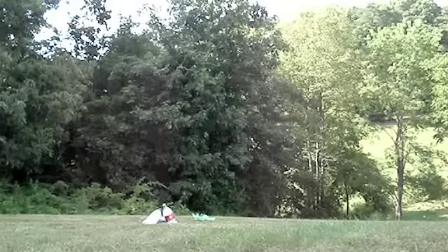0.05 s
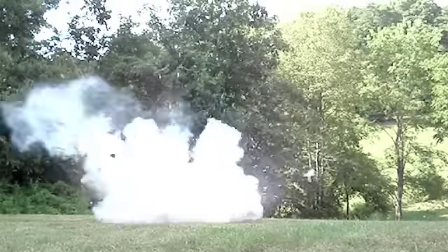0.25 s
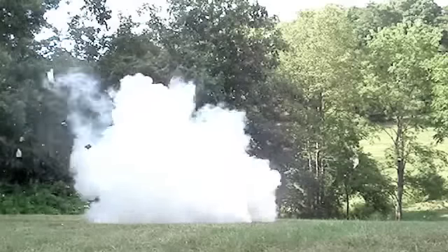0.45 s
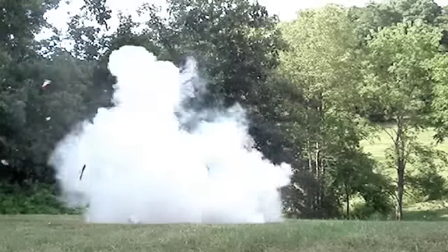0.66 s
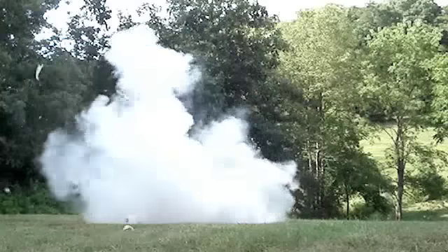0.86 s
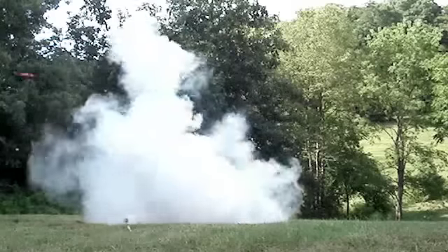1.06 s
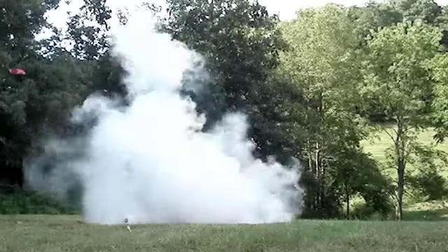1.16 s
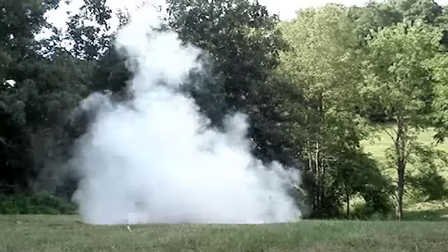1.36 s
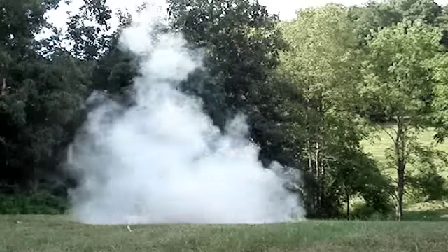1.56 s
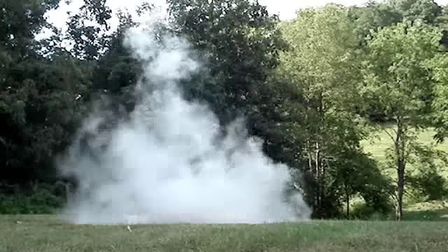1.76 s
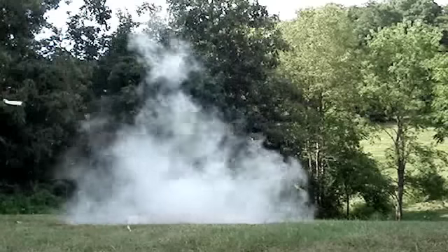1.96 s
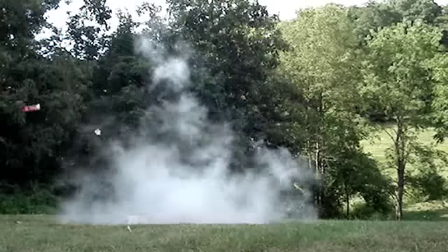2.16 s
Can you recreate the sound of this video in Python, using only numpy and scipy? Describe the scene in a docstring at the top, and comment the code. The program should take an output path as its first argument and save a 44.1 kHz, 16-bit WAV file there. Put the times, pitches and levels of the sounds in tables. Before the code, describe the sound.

One explosion on a lawn by trees: brief faint hiss, then a hard clipped crack with a short low thump, a bright dense roar, scattered echo slaps and dulling rumble, faint debris ticks, on a small distant microphone.

```python
"""A lawn near a tree line, where a sealed gas charge bursts, heard from a distance by a small microphone.
Steep shock fronts and damped low thumps overload it. The near trees throw back a bright roar and far woods
and slopes a grainy rumble that dulls with distance, both built from clumped, coloured noise. Short ringing
bursts make slaps off large surfaces, and clicks of noise make debris ticks. Beneath lie faint shaped-noise
hiss and wind, with fuzzy sine tones for a hum and two insects."""
import sys
import numpy as np
from scipy import signal
from scipy.fft import rfft, irfft
from scipy.io import wavfile
from scipy.ndimage import uniform_filter1d

SR = 44100
rng = np.random.default_rng(int(sys.argv[2]) if len(sys.argv) > 2 else 0)


def generate_wav(signal):
    """Clip the signal to [-1, 1] and save it as 16-bit WAV at the path in sys.argv[1]."""
    frames = np.transpose(np.atleast_2d(signal))
    scaled = np.clip(frames, -1, 1) * 32767
    pcm = np.round(scaled).astype(np.int16)
    wavfile.write(sys.argv[1], SR, pcm)


N = 97020
T = np.arange(N) / SR  # s

# Shock fronts, level before the short onset rounds them: t/s, level/dB, length/ms
SHOCK_FRONTS = [(.2474, 3, 0.18), (0.2494, 6, 0.17), (0.2533, 3, 0.48), (0.2587, -4, 0.75),
                (0.2621, 1, 0.34), (0.2661, 8, 0.16), (0.2752, 14, 0.21), (.2798, 15, 0.068)]
# Low thumps of the expanding gas and their slaps: t/s, f/Hz, starting level/dB, 60 dB decay time/s
GAS_THUMPS = [(0.248, 318, -4.5, 0.049), (0.2529, 138, 3.5, 0.033), (0.264, 313, -12, 0.041),
              (0.2823, 300, -6.5, 0.009), (.3630, 330, -26, 0.025), (0.2646, 157, -18, 0.076),
              (.3240, 147, -10.5, 0.048), (0.354, 175, -26, .08)]
FRONT_S = .00004  # time constant of the shock onset


def blast():
    """Steep fronts swing one way and then back; the gas adds sine swings that die exponentially."""
    out, t = np.zeros(N), T[:6000]
    for start, db, length_ms in SHOCK_FRONTS:
        u = t * 1000 / length_ms
        onset = 1 - np.exp(-t / FRONT_S)
        swing = (1 - (u / 2) ** 2) * np.exp(-u * u / 2)  # crosses zero after two lengths
        add(out, start, -gain_of(db) * onset * swing)
    for start, hz, db, t60 in GAS_THUMPS:
        add(out, start, gain_of(db - 60 * t / t60) * np.sin(2 * np.pi * hz * t))
    return out


# Roar envelopes of the near trees: t/s, middle level/dB, treble level/dB, bass level/dB
NEAR_LEVELS = [(.247, -10, -19, -28), (0.249, -17, -20, -28), (0.2555, -12, -7, -30),
               (0.256, -32, -16, -28), (0.259, -9, -14, -30), (.262, -10.5, -17, -25),
               (0.268, -17, -18, -25), (0.276, -16, -15, -22.5), (0.29, -23.5, -11, -20.5),
               (0.303, -21, -12.5, -33), (.33, -13, -12.5, -19), (0.375, -12.5, -14, -21.5),
               (0.409, -16.5, -17, -29), (.5, -22.5, -26, -31), (.58, -30.5, -33, -42.5),
               (0.699, -37, -54, -68)]
# Spectra of the roar's middle, treble and bass: f/Hz, relative level/dB (per Hz)
NEAR_MIDDLE_COLOUR = [(290, -23), (550, -13.5), (800, -3.5), (1400, -4), (2200, -5.5), (3200, -12.5),
                      (6000, -37), (22000, -100)]
NEAR_TREBLE_COLOUR = [(1000, -30), (2000, -9), (3300, -4), (4800, -6.5), (6300, -10), (9200, -18),
                      (10200, -25), (22000, -76)]
NEAR_BASS_COLOUR = [(20, -30), (50, -21), (120, -3.5), (320, 1.5), (600, -6), (1200, -42), (22000, -84)]
NEAR_PATCHY_DB = .9


def near_trees():
    """Dense bright scatter in three bands, starting with the first shock front."""
    times, *band_levels = np.transpose(NEAR_LEVELS)
    colours = NEAR_MIDDLE_COLOUR, NEAR_TREBLE_COLOUR, NEAR_BASS_COLOUR
    roar = np.zeros(N)
    for db, colour, grain_s in zip(band_levels, colours, (.002, .001, .005)):
        band = scatter(colour, grain_s, spread_db=0.5, patchy_db=NEAR_PATCHY_DB)
        roar += gain_of(np.interp(T, times, db, right=-120)) * band
    return (T > SHOCK_FRONTS[0][0]) * roar


# Distinct slaps from single large surfaces: t/s, level/dB, centre f/Hz, decay/s (swell peaks at half of it)
SURFACE_SLAPS = [(0.248, 3.5, 2680, 0.0028), (0.2752, -1, 1852, 0.0091), (0.28, 1.5, 2410, 0.0023),
                 (.6102, -13, 2880, 0.0019), (.6135, -26, 1540, 0.0042), (.6200, -11, 874, 0.0038),
                 (.6560, -19, 2630, 0.01), (.6625, -18, 1220, 0.003), (.7185, -14, 1700, 0.0041),
                 (.7640, -22, 684, 0.006), (.7844, -30, 1420, 0.0036), (1.108, -28, 980, .006),
                 (1.150, -16, 1370, 0.0037), (1.313, -27, 586, 0.0049), (1.347, -29, 460, 0.0015),
                 (1.630, -23.5, 920, 0.003), (1.690, -39, 350, 0.0042), (1.768, -33, 1240, 0.011),
                 (2.145, -26, 285, 0.0042)]
SLAP_WIDTH, SLAP_RING, SLAP_NOISE = .8, .35, .25  # band spread as a fraction, then mix of sine and noise


def surface_slaps():
    """Each reflection swells and dies briefly, a sine ring mixed with noise around its centre pitch."""
    out, t = np.zeros(N), T[:2000]
    for start, db, hz, decay in SURFACE_SLAPS:
        edges = [hz / (1 + SLAP_WIDTH), hz * (1 + SLAP_WIDTH)]
        band = signal.butter(2, edges, "band", fs=SR)
        noise = evened(signal.lfilter(*band, rng.standard_normal(len(t))))
        burst = SLAP_RING * np.sin(2 * np.pi * hz * t) + SLAP_NOISE * noise
        u = 2 * t / decay
        swell = np.e * u * np.exp(-u)  # peaks at 1
        add(out, start, gain_of(db) * burst * swell)
    return out


# Rumble envelopes of far woods and slopes: t/s, roar level/dB, bass level/dB, deep bass level/dB
FAR_LEVELS = [(.55, -44, -37, -55), (.62, -30.5, -37, -37.5), (.70, -32.5, -38, -43.5),
              (.76, -29, -37, -45), (.82, -29, -34, -46), (.88, -27.5, -33, -34), (0.951, -28, -34, -42),
              (1.02, -30.5, -33, -50), (1.12, -31.5, -36.5, -45), (1.2, -35, -40.5, -47),
              (1.3, -36.5, -38.5, -48.5), (1.4, -39.5, -40, -56), (1.52, -42, -42, -51),
              (1.6, -43.5, -41, -55), (1.68, -46.5, -41, -49), (1.76, -38.5, -44, -52),
              (1.83, -44, -45, -55), (1.92, -47.5, -50, -59), (2.0, -55, -46, -56), (2.07, -60, -47.5, -63),
              (2.12, -54, -46, -65), (2.2, -47, -41, -60)]
# Spectra of the rumble's roar (as it is at FAR_S), bass and deep bass: f/Hz, relative level/dB (per Hz)
FAR_ROAR_COLOUR = [(300, -28), (550, -10), (950, -2), (1400, -3.5), (2100, -8), (3300, -13.5), (4800, -18),
                   (6500, -24.5), (8000, -34.5), (10000, -49.5), (22000, -100)]
FAR_BASS_COLOUR = [(110, -57), (190, -22.5), (243, -2), (386, -1.5), (447, -4), (700, -13.5), (910, -14),
                   (1540, -120)]
FAR_DEEP_COLOUR = [(20, -28), (45, -29), (90, -8), (150, 1), (200, -1.5), (300, -36), (22000, -120)]
FAR_S, FAR_RISE_S = .85, 0.16  # reference time of the air loss, fade-in before the first level
AIR_DB_PER_S, AIR_POWER = 4, 1.334  # scale and frequency power of the air loss, relative to 1 kHz
FAR_PATCHY_DB = 1.1


def far_woods():
    """Lumpier scatter in three bands; air steadily dulls the roar as its echo paths lengthen."""
    times, roar_db, bass_db, deep_db = np.transpose(FAR_LEVELS)
    roar = scatter(FAR_ROAR_COLOUR, 0.0036, spread_db=1.0, air_db=AIR_DB_PER_S, patchy_db=FAR_PATCHY_DB)
    bass = scatter(FAR_BASS_COLOUR, .004, spread_db=2.0, patchy_db=FAR_PATCHY_DB)
    # negative spreads turn the peaks into dips
    deep = scatter(FAR_DEEP_COLOUR, 0.013, spread_db=-2.1, patchy_db=-2.85)
    rumble = gain_of(np.interp(T, times, roar_db)) * roar
    rumble += gain_of(np.interp(T, times, bass_db)) * bass
    rumble += gain_of(np.interp(T, times, deep_db)) * deep
    return np.clip(1 + (T - times[0]) / FAR_RISE_S, 0, 1) * rumble


# Debris ticking on the ground: t/s, level/dB (before the burst's own noise level)
DEBRIS_TICKS = [(1.3524, -40), (1.4160, -27.5), (1.4254, -32), (1.434, -45), (1.5734, -50), (1.6824, -41),
                (2.0326, -35), (2.104, -33)]
TICK_S, TICK_LOW_HZ, TICK_HIGH_HZ = 0.0015, 1700, 7000  # decay time constant, noise band
TICK_BODY_HZ, TICK_BODY = 2220, 0.41  # pitch and share of the sine body


def debris_ticks():
    """Each impact is a quickly dying burst of treble noise with a short sine body."""
    out, t = np.zeros(N), T[:2000]
    band = signal.butter(2, [TICK_LOW_HZ, TICK_HIGH_HZ], "band", fs=SR)
    for start, db in DEBRIS_TICKS:
        noise = signal.lfilter(*band, rng.standard_normal(len(t)))
        body = TICK_BODY * np.sin(2 * np.pi * TICK_BODY_HZ * t)
        add(out, start, gain_of(db) * (noise + body) * np.exp(-t / TICK_S))
    return out


# Spectrum of the faint hiss: f/Hz, relative level/dB (per Hz)
HISS_COLOUR = [(20, -23), (40, -8), (120, -8.5), (200, 1), (450, -2.5), (1400, -6.5), (3500, -11.5),
               (7300, -18.5), (8500, -18.5), (10000, -23), (22000, -62)]
HISS_DB = -46.5


def hiss():
    """Fine-grained shaped noise at a steady level."""
    return gain_of(HISS_DB) * scatter(HISS_COLOUR, 0.00057, spread_db=1, patchy_db=-0.54)


# Low wind on the microphone: t/s, level/dB
WIND_LEVELS = [(0, -56), (.2, -62.5), (.5, -76), (1.8, -72), (2.2, -65)]
# Spectrum of the wind: f/Hz, relative level/dB (per Hz)
WIND_SPECTRUM = [(15, -13), (40, -2), (110, -2), (250, -20), (22000, -120)]


def wind():
    """Low noise on the microphone with a slow level curve and coarse grain."""
    return gain_of(np.interp(T, *np.transpose(WIND_LEVELS))) * scatter(WIND_SPECTRUM, .02, spread_db=-3.0)


# Steady thin tones, a hum and two insects: f/Hz, rms level/dB, fuzz bandwidth/Hz, fuzz amount/0-1
THIN_TONES = [(236, -52.5, 3, 0.17), (7950, -74.5, 30, .6), (8680, -67, 90, .8)]


def hum_and_insects():
    """Sines whose strength and phase are roughened by slow complex noise."""
    out = np.zeros(N)
    for hz, db, width, fuzz in THIN_TONES:
        noise = rng.standard_normal(N) + 1j * rng.standard_normal(N)
        slow = signal.lfilter([1], [1, -np.exp(-np.pi * width / SR)], noise)
        carrier = np.exp(2j * np.pi * hz * T)
        tone = ((1 + fuzz * slow / np.std(slow)) * carrier).real
        out += gain_of(db) * evened(tone)
    return out


def scatter(colour, grain_s, spread_db, air_db=0., patchy_db=0.):
    """Dense small echoes as noise in uneven clumps, patchy in time and pitch, dulled by air and coloured."""
    size = max(round(grain_s * SR), 1)
    clumps = rng.exponential(1, N) - 1
    clumps = evened(uniform_filter1d(uniform_filter1d(clumps, size), size))
    grains = evened(rng.standard_normal(N) * gain_of(spread_db * clumps))
    hz, t, z = signal.stft(grains, SR, nperseg=512, noverlap=384)
    patches = uniform_filter1d(rng.standard_normal(z.shape), 8, 0)
    patches = evened(uniform_filter1d(patches, 6, 1))
    # zero at 1 kHz, growing with frequency and time
    loss_db = air_db * ((hz[:, None] / 1000) ** AIR_POWER - 1) * np.maximum(t - FAR_S, -.2)
    z = z * gain_of(patchy_db * patches - loss_db)
    patchy = signal.istft(z, SR, nperseg=512, noverlap=384)[1][:N]
    tint = evened(gain_of(read(colour, np.fft.rfftfreq(N, 1 / SR))))
    return irfft(rfft(patchy) * tint, N)


def gain_of(db):
    """Amplitude factor of a level in dB."""
    return 10 ** (np.asarray(db) / 20)


def evened(x):
    """Scale to an rms of 1."""
    return x / np.sqrt(np.mean(x ** 2) + 1e-20)


def read(points, hz):
    """Read a spectrum curve along a logarithmic frequency axis."""
    f, value = np.transpose(points)
    return np.interp(np.log(hz + 1), np.log(f + 1), value)


def add(mix, start, sound):
    """Lay a sound into the mix at a time in s, cut at the end."""
    part = mix[round(start * SR):][:len(sound)]
    part += sound[:len(part)]


def below(x, edge_hz):
    """Steep linear-phase low-pass."""
    return signal.oaconvolve(x, signal.firwin(801, edge_hz, window=("kaiser", 10), fs=SR), "same")


TREBLE_HZ, EDGE_HZ = 10100, 16200  # above the first the treble is turned down, the second is the band limit
CLIP_DB, KNEE = -.4, 5.0  # overload ceiling, knee sharpness
TOP_DB = -9  # gain of the treble above TREBLE_HZ


def scene():
    """The blast at full bandwidth over all softer layers, which are limited to below TREBLE_HZ."""
    echoes = near_trees() + surface_slaps() + far_woods()
    soft = echoes + debris_ticks() + hiss() + wind() + hum_and_insects()
    return (blast() + below(soft, TREBLE_HZ))[None]


def record(dry):
    """Overload with a rounded knee, turn down what lies above TREBLE_HZ, then the band limit."""
    drive = abs(dry[0] / gain_of(CLIP_DB))
    held = dry[0] / (1 + drive ** KNEE) ** (1 / KNEE)
    body = below(held, TREBLE_HZ)
    top = held - body
    return below(body + gain_of(TOP_DB) * top, EDGE_HZ)[None]


dry = scene()
out = record(dry)
generate_wav(out)
```